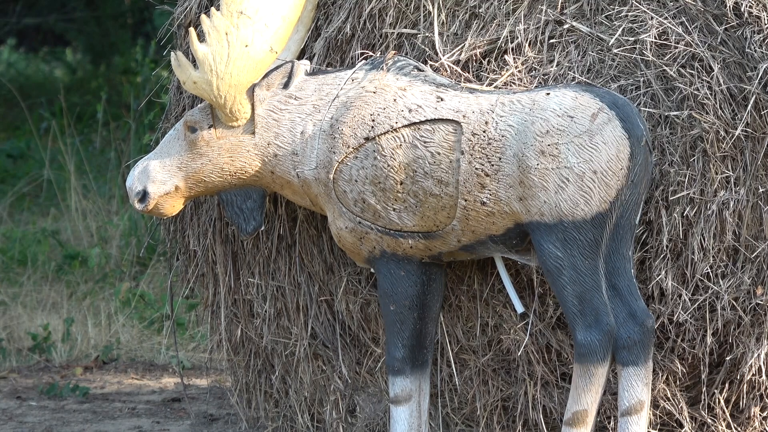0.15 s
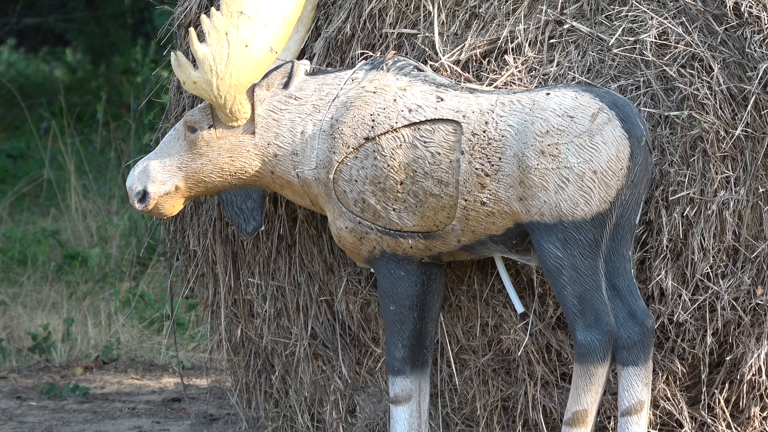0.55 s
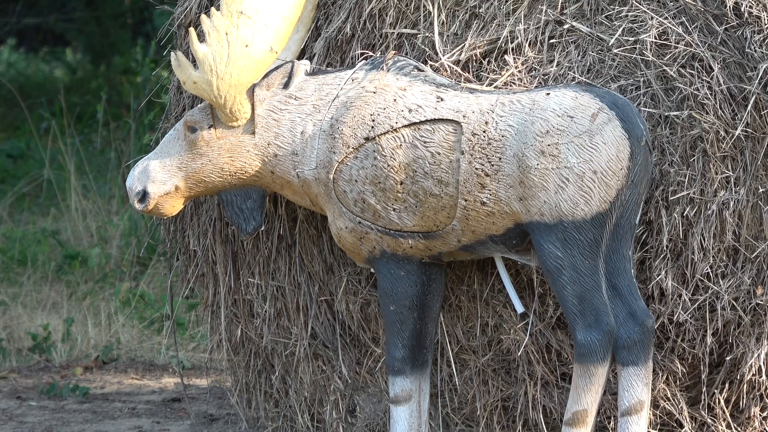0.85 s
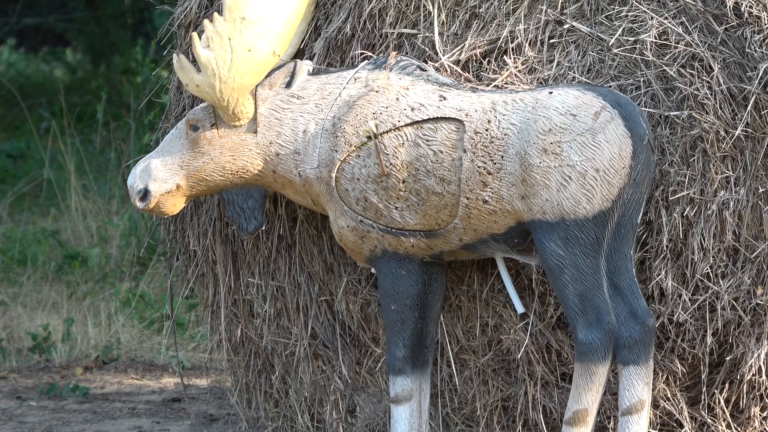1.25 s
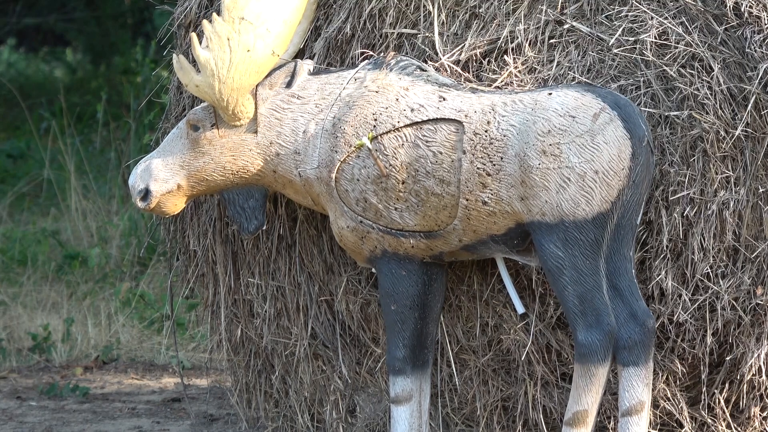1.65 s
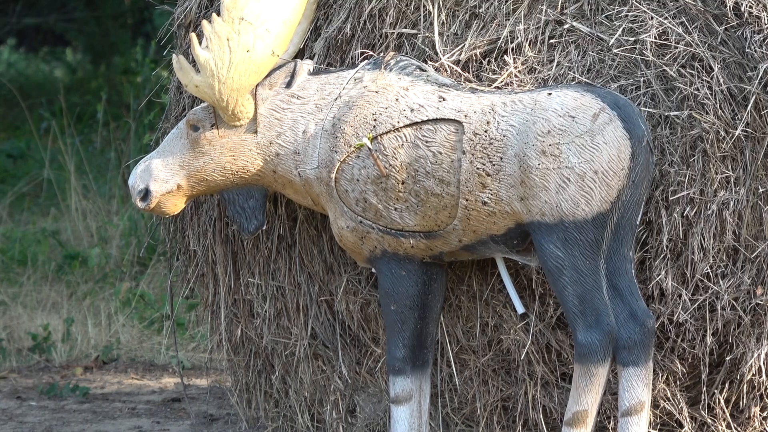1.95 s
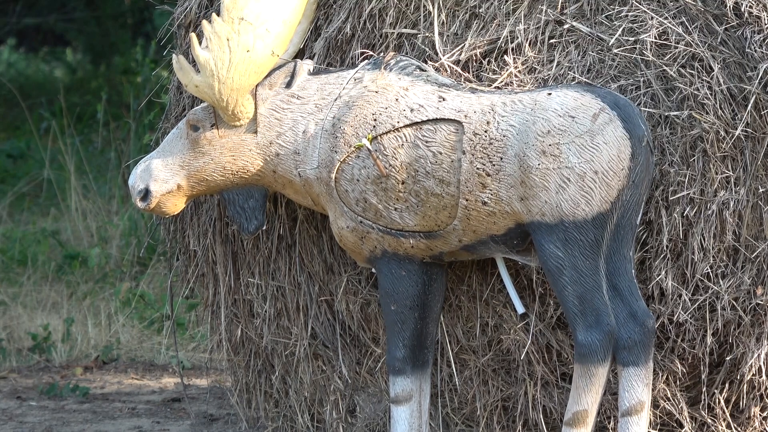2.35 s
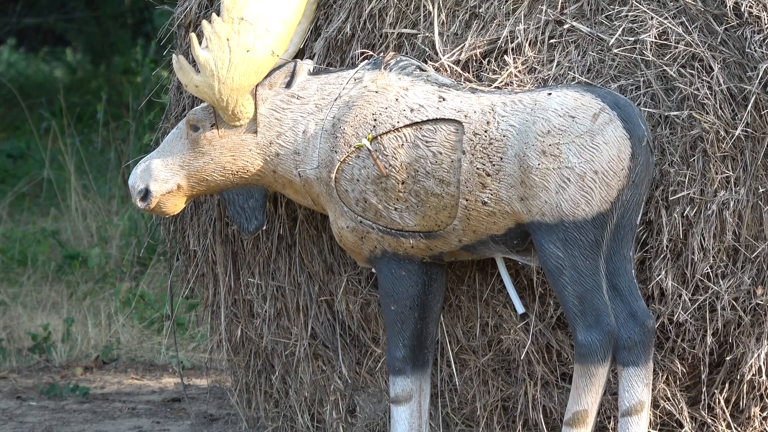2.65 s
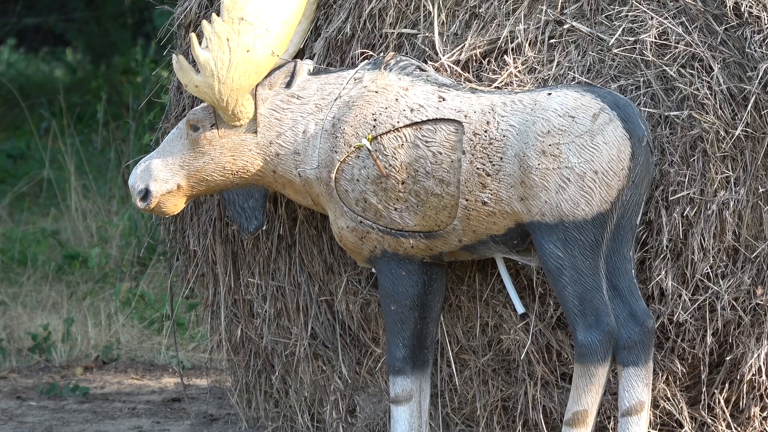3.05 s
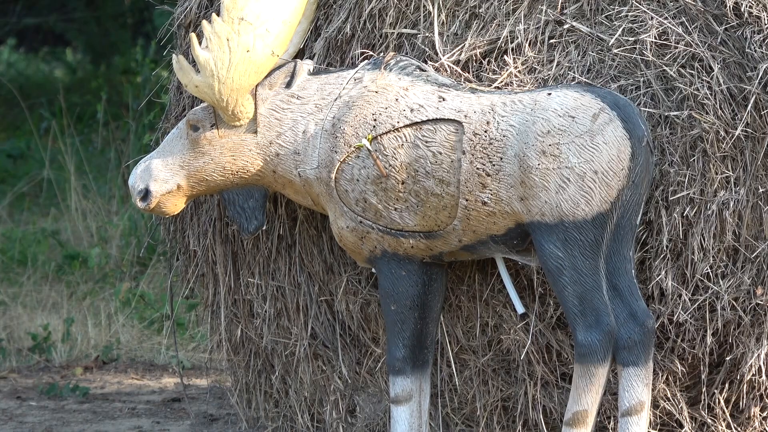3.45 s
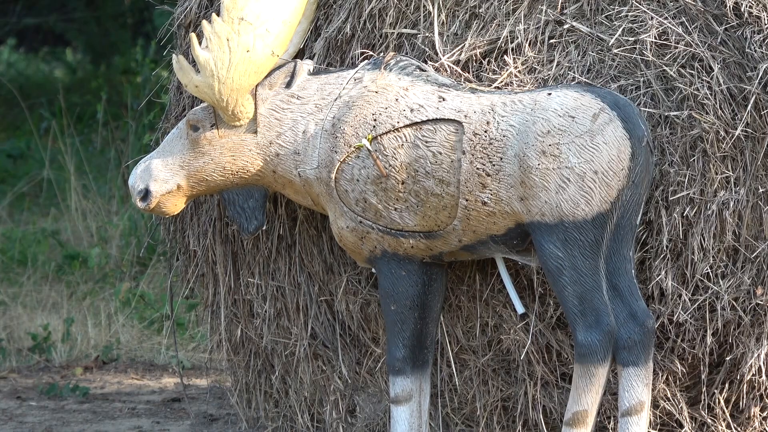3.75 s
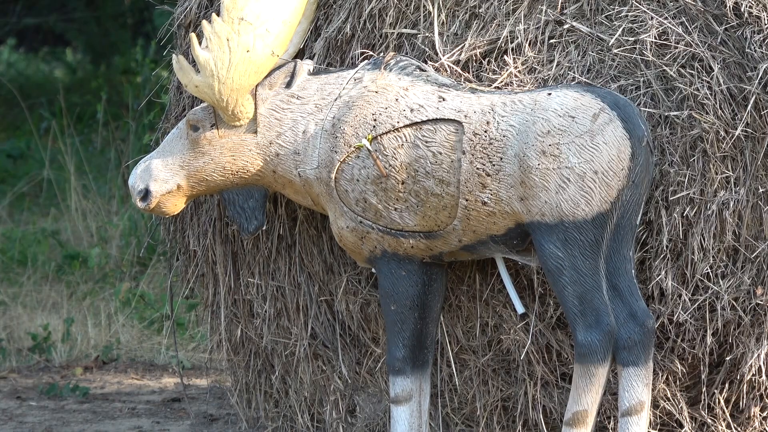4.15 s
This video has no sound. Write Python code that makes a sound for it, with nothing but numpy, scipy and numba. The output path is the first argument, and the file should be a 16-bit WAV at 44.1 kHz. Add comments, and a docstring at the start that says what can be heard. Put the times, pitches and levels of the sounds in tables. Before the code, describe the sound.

Steady shimmering insects fill an open yard, with a faint hum beneath. After some faint, quick bird peeps comes a loud, hard bow release with a short woody rattle, then a knock as the arrow strikes the foam target, leaving a short scattered echo. The insects carry on and grow louder while grainy rustles and small crunches come in bouts close to the mono microphone, and two short whistled peeps sound.

```python
"""Insects hiss throughout, as shaped noise that slowly swells, over low air noise and a faint hum; four faint bird
peeps, gliding sines, come early. Then a bow is shot: damped modes and noise bursts snap, slam and buzz out.
A quarter second later the arrow knocks into a foam target with a crack and a dull thump, and clicks as it settles.
Soft noise rustles with crunches near the mono microphone grow later on, and two louder peeps sound.
A gain control ducks under loud sounds such as the shot."""
import sys
import numpy as np
from scipy import signal
from scipy.fft import rfft, irfft
from scipy.io import wavfile
from scipy.ndimage import uniform_filter1d
from numba import njit

SR = 44100
rng = np.random.default_rng(int(sys.argv[2]) if len(sys.argv) > 2 else 0)


def file_out(sig):
    """Save sig as 16-bit WAV at sys.argv[1]."""
    # one column per channel
    cols = np.atleast_2d(sig).T
    # limit, then scale
    lim = np.clip(cols, -1, 1)
    pcm = np.round(lim * 32767).astype(np.int16)
    wavfile.write(sys.argv[1], SR, pcm)


N = 189541
T = np.arange(N) / SR  # time in seconds

# Colours of noise. Each row: frequency in Hz, relative level in dB per Hz.
# Low outdoor rumble.
AIR_COLOUR = [(20, -5), (33, -5), (45, 5.5), (64, 2), (90, -1.5), (125, -9.5), (170, -9), (275, -17.5),
              (400, -17), (800, -26.5), (2000, -25.5)]
# Lower and higher parts of the insect chorus.
LOW_SINGERS_COLOUR = [(1500, -24), (2000, -20), (2380, -13), (2700, -10.5), (3100, -1), (4000, 0.5),
                      (5000, -0.5), (6000, -21), (8000, -20)]
HIGH_SINGERS_COLOUR = [(4000, -26), (5000, -5), (5800, 0.5), (6600, -0.5), (7500, -2), (8400, -5),
                       (9400, -13), (10700, -26.5), (12600, -23.5), (14000, -30.5), (15500, -59)]
# Soft rustling near the microphone.
RUSTLE_GRAIN_COLOUR = [(150, 1.5), (300, 0), (600, 4), (1300, -1), (2200, -0.5), (5000, -38), (14000, -36)]
# Echoes of the yard.
ECHO_COLOUR = [(80, -3), (250, -3), (700, -9), (2000, 7), (5000, -7), (14000, -25)]
# Sharp noise of the snap, the sliding shaft and the strike.
CRACK_NOISE_COLOUR = [(400, 4), (900, 0.5), (2300, -11.5), (3000, -7), (4600, -11.5), (8000, -18),
                      (15500, -42)]
# Rattle of the bow's loose fittings and slam of the string.
RATTLE_NOISE_COLOUR = [(300, 16), (700, 4.5), (2300, 0), (4000, 0), (7000, -17), (11000, -11.5),
                       (15500, -14)]

# Single insects that stand out. Each row: frequency in Hz, level in dB before the swell and a slow drift.
SOLO_INSECTS = [(5630, -40), (5846, -37.5), (6360, -38.5), (6546, -40), (6971, -40), (7290, -38),
                (7687, -47), (8333, -44.5), (9270, -47.5)]
# Phrases in which the chorus lifts. Each row: middle of the rise in seconds, middle of the fall in seconds, lift in dB.
CHORUS_PHRASES = [(-.1, 0.383, 2.5), (1.25, 1.605, 2), (1.714, 2.307, 1.9), (2.525, 3.004, 2),
                  (3.185, 3.54, 2), (3.79, 4.4, 1.1)]
# Bird peeps. Each row: start in seconds, length in seconds, top pitch in Hz, level in dB, before small wavers.
BIRD_PEEPS = [(-.008, .03, 2390, -37), (.04, 0.027, 2420, -37), (.086, .032, 2420, -33.5),
              (.135, 0.028, 2400, -37), (2.753, .088, 2150, -33.5), (3.396, .082, 2065, -30)]
# Bouts of stronger rustling. Each row: middle in seconds, half length in seconds, level in dB.
RUSTLE_BOUTS = [(2.583, .16, -40.5), (3.107, 0.13, -38), (3.31, 0.14, -43.5), (3.66, 0.077, -40.5),
                (3.975, 0.12, -41), (4.3, .08, -42)]
# The loudest crunches in the rustle. Each row: start in seconds, level in dB.
LOUD_CRUNCHES = [(2.445, -34), (2.644, -30.5), (2.699, -27), (3.184, -29), (3.279, -33), (3.376, -37),
                 (3.528, -33.5), (3.686, -36)]
# Light clicks as the stuck arrow settles. Each row: start in seconds, level in dB.
SETTLING_CLICKS = [(1.238, -26), (1.267, -28), (1.29, -29), (1.39, -32.5)]
# Arrow shaft and foam skin at the strike. Each row: frequency in Hz, level in dB, T60 decay in seconds.
SHAFT_MODES = [(277, -17, 0.042), (558, -10.5, 0.027), (1025, -5, 0.014), (1940, -11, 0.014)]
# The snap of the release. Each row: frequency in Hz, level in dB, T60 decay in seconds.
SNAP_MODES = [(330, -25, 0.0089), (656, 0, 0.032), (1030, -2, 0.018), (1290, -7.5, 0.035), (1900, -28, .04),
              (2370, -14, 0.029), (4070, -2, 0.0088)]
# Limbs, string and riser after the shot. Each row: frequency in Hz, level in dB before the rising tilt
# and the slow build-up, T60 decay in seconds.
BOW_MODES = [(96.2, -21.5, 1.22), (140.4, -18.5, 0.43), (195.2, -7.5, 0.2), (240, -11, 0.15),
             (365, -1.5, 0.14), (406, 5.5, 0.14), (486, -12.5, 0.22), (551, -17, 0.24), (636, -14, 0.18),
             (678, -45, 1.55), (1174, -25, 0.15), (1270, -29, 0.16), (1466, -22, 0.12), (1950, -16.5, 0.09)]

# Moments: string let go, shaft slides over the rest, string pulled taut, tip enters, foam bulges.
LOOSE_S, SLIDE_S, BRACE_S, STRIKE_S, BULGE_S = 0.9458, 0.959, 0.964, 1.2155, 1.2237

# Steady swell of the chorus: level at the start and growth.
LOW_DB, LOW_SWELL_DB_PER_S = -28.5, 1.2544
HIGH_DB, HIGH_SWELL_DB_PER_S = -26, 1.5948
PHRASE_RISE_S, PHRASE_FALL_S = 0.18, 0.073
LOW_JOIN_SHARE = 0.27  # how far the low singers follow a phrase

# A faint stir sets in before the shot, steady rustling later: middle of the ramp, its length, level.
STIR_S, STIR_RISE_S, STIR_DB = 0.69, 0.14, -52.5
RUSTLE_S, RUSTLE_RISE_S, RUSTLE_DB = 2.23, 0.22, -45.5
CRUNCH_HZ, CRUNCH_WIDTH_HZ, CRUNCH_T60_S = 1380, 580, 0.056
CRACKLES_PER_S, CRACKLE_GAIN_DB, CRACKLE_T60_S = 26, 2.5, 0.037
CRACKLE_HZ, CRACKLE_WIDTH_HZ = 1170, 1200

SETTLE_HZ, SETTLE_WIDTH_HZ, SETTLE_T60_S = 1800, 2200, 0.024
TOP_HZ = 15700  # treble cutoff


def undb(db):
    """Decibels to gain."""
    return 10 ** (np.asarray(db) / 20)


def unit(x):
    """Scale to rms 1."""
    return x / np.sqrt(np.mean(x ** 2))


def noise(colour, patchy_db=0):
    """Noise of rms 1 that follows a colour table and falls away beyond its ends; patchy_db adds fine ridges."""
    hz, db = np.transpose(colour)
    f = np.fft.rfftfreq(N, 1 / SR) + 1  # the 1 Hz offset keeps the logarithm finite
    ridges = unit(uniform_filter1d(rng.standard_normal(len(f)), size=150))
    gain = undb(np.interp(np.log(f), np.log(hz), db) + patchy_db * ridges)
    ends = np.minimum(1, np.minimum(f / hz[0], hz[-1] / f)) ** 2
    spectrum = rfft(rng.standard_normal(N)) * gain * ends
    return unit(irfft(spectrum, N))


def band(hz, width_hz):
    """Noise of rms 1 in one resonance."""
    f = np.fft.rfftfreq(N, 1 / SR) + 1
    detuning = (f - hz * hz / f) / width_hz
    spectrum = rfft(rng.standard_normal(N)) / (1 + detuning ** 2)
    return unit(irfft(spectrum, N))


def drift(rate):
    """Smooth random wander of rms 1 that takes about rate new values a second."""
    hold = max(int(SR / rate), 1)
    steps = np.repeat(rng.standard_normal(N // hold + 1), hold)
    return unit(uniform_filter1d(steps, hold)[:N])


def fade(start, t60):
    """An envelope that jumps to 1 at start and dies away by 60 dB in t60 seconds."""
    return (T >= start) * np.exp(-np.log(1000) * np.maximum(T - start, 0) / t60)


def swell(middle, width):
    """A bell-shaped envelope."""
    return np.exp(-((T - middle) / width) ** 2)


def rise(middle, length):
    """A straight ramp from 0 to 1 that is half way at middle."""
    return np.clip(0.5 + (T - middle) / length, 0, 1)


def ring(start, modes, step=1):
    """Damped modes set off by one blow; each is scaled by step over the last, and a negative step flips its sign."""
    total = 0
    for k, (hz, db, t60) in enumerate(modes):
        tone = np.sin(2 * np.pi * hz * (T - start))
        total = total + step ** k * undb(db) * fade(start, t60) * tone
    return total


def clicks(rows, hz, width_hz, t60):
    """Short noise bursts that share one resonance and decay."""
    envelope = sum(undb(db) * fade(start, t60) for start, db in rows)
    return envelope * band(hz, width_hz)


def air():
    """A low outdoor rumble that wavers in level, and a far hum of very narrow noise."""
    rumble = noise(AIR_COLOUR) * undb(-43 + drift(5.97))
    hum = undb(-56.5) * band(284.9, 7.3)
    return rumble + hum


def insects(stroke_hz=41, stroke_db=0.39, solo_width_hz=18):
    """Many raspers merge into a swelling hiss that throbs with wing strokes; a few near ones hold narrow tones."""
    lift_db = 0
    for start, end, db in CHORUS_PHRASES:
        lift_db = lift_db + db * rise(start, PHRASE_RISE_S) * (1 - rise(end, PHRASE_FALL_S))
    low_db = LOW_DB + LOW_SWELL_DB_PER_S * T + LOW_JOIN_SHARE * lift_db
    high_db = HIGH_DB + HIGH_SWELL_DB_PER_S * T + lift_db

    # the stroke rate wanders slightly
    phase = 2 * np.pi * np.cumsum(stroke_hz * (1 + 0.019 * drift(4.93))) / SR
    throb_db = stroke_db * (np.cos(phase) + 0.76 * np.cos(2 * phase))

    low_flicker_db = 0.35 * drift(25.35) + 0.95 * drift(600)
    high_flicker_db = 0.38 * drift(17) + 0.47 * drift(700)
    low = noise(LOW_SINGERS_COLOUR, patchy_db=1.2) * undb(low_db + throb_db + low_flicker_db)
    high = noise(HIGH_SINGERS_COLOUR, patchy_db=1.0) * undb(high_db + throb_db + high_flicker_db)
    solo = sum(undb(db + drift(2.86)) * band(hz, solo_width_hz) for hz, db in SOLO_INSECTS)
    return low + high + solo * undb(high_db - high_db.mean())


def bird(arch=0.14):
    """Short pure whistles whose pitch and loudness arch up and down."""
    out = 0
    for start, length, top_hz, db in BIRD_PEEPS:
        u = np.clip(2 * (T - start) / length - 1, -1, 1)  # from -1 at the start to 1 at the end
        pitch = top_hz * (1 - arch * u ** 2 + 0.0034 * drift(150))
        whistle = np.sin(2 * np.pi * np.cumsum(pitch) / SR)
        out = out + undb(db + drift(130)) * (1 - u ** 2) * whistle
    return out


def crackle():
    """Tiny crunches of random size at random moments."""
    hits = (rng.random(N) < CRACKLES_PER_S / SR) * rng.uniform(0, 1.9, N)
    envelope = signal.fftconvolve(hits, fade(0, CRACKLE_T60_S))[:N]
    return envelope * band(CRACKLE_HZ, CRACKLE_WIDTH_HZ) * undb(CRACKLE_GAIN_DB)


def rustle():
    """An uneven grainy rustle that comes in bouts, with a few distinct crunches and one brief high swish."""
    parts = [undb(STIR_DB) * rise(STIR_S, STIR_RISE_S), undb(RUSTLE_DB) * rise(RUSTLE_S, RUSTLE_RISE_S)]
    parts += [undb(db) * swell(middle, half) for middle, half, db in RUSTLE_BOUTS]
    strength = np.sqrt(sum(part ** 2 for part in parts))  # the layers add in power
    flicker_db = 0.62 * drift(25.16) + 1.4 * drift(250)
    grain = noise(RUSTLE_GRAIN_COLOUR) * undb(flicker_db) + crackle()
    crunches = clicks(LOUD_CRUNCHES, CRUNCH_HZ, CRUNCH_WIDTH_HZ, CRUNCH_T60_S)
    swish = undb(-42) * swell(3.12, 0.046) * band(14500, 3000)
    return strength * grain + crunches + swish


def yard(x, early_db=-23, early_t60=0.16, late_db=-32, late_t60=0.89):
    """Scattered echoes from ground and hay, and a faint long tail from the trees, as decaying noise."""
    early = undb(early_db) * unit(fade(0.0086, early_t60))
    late = undb(late_db) * unit(fade(0.016, late_t60))
    response = (early + late) * noise(ECHO_COLOUR) / np.sqrt(N)
    return signal.fftconvolve(x, response)[:N]


def settling():
    """The stuck arrow settles with light clicks of resonant noise."""
    return clicks(SETTLING_CLICKS, SETTLE_HZ, SETTLE_WIDTH_HZ, SETTLE_T60_S)


def strike(bulge_hz=215, bulge_db=-3.0):
    """The tip cracks through the skin; the foam stops the arrow, and its flank bulges once with a dull thump."""
    crack = ring(STRIKE_S, SHAFT_MODES) + undb(-13.0) * fade(STRIKE_S, 0.021) * noise(CRACK_NOISE_COLOUR)
    # the stuck shaft shivers out
    shiver = undb(-28.0) * fade(STRIKE_S, 0.26) * noise(CRACK_NOISE_COLOUR)
    # pressure follows the flank's acceleration
    u = (np.pi * bulge_hz * (T - BULGE_S)) ** 2
    thump = undb(bulge_db) * (1 - 2 * u) * np.exp(-u)
    return crack + shiver + thump


def shot():
    """The release snaps, the shaft sings over the rest, then the string slams taut and the bow rings and rattles."""
    # the catch opens just before the string goes
    trigger = undb(-17) * fade(LOOSE_S - 0.0015, 0.018) * band(1700, 1500)
    snap = ring(LOOSE_S, SNAP_MODES, -1.0) + undb(-5.5) * fade(LOOSE_S, 0.029) * noise(CRACK_NOISE_COLOUR)
    scrape = undb(-16.5) * band(2250, 250) + undb(-14.5) * noise(CRACK_NOISE_COLOUR)
    slide = swell(SLIDE_S, 0.011) * scrape
    slam = undb(-7) * fade(BRACE_S, 0.0071) * noise(RATTLE_NOISE_COLOUR)
    slam = slam + ring(BRACE_S, [(207, 0.5, 0.036)])
    # loose fittings buzz once on each swing of the string, at the pitch of the third bow mode
    buzz = undb(5.8 * np.cos(2 * np.pi * BOW_MODES[2][0] * (T - BRACE_S)))
    rattle = undb(-10.0) * fade(BRACE_S, 0.24) * buzz * noise(RATTLE_NOISE_COLOUR)
    # the limbs need a few swings to hand their energy to the rest of the bow
    build_up = 1 - 0.69 * fade(BRACE_S, 0.26)
    body = ring(BRACE_S, BOW_MODES, -1.066) * build_up
    return trigger + snap + slide + slam + rattle + body


def scene():
    """Shot and strike with their echoes, over air, insects, bird and rustle, the same in both channels."""
    background = air() + insects() + bird() + rustle()
    knocks = strike() + shot()
    mono = background + knocks + yard(knocks) + settling()
    return np.array([mono, mono])


@njit
def follow(x, attack, release):
    """Envelope follower with separate rise and fall rates."""
    out, level = np.empty(len(x)), 0.
    for i in range(len(x)):
        rate = attack if abs(x[i]) > level else release
        level += (abs(x[i]) - level) * rate
        out[i] = level
    return out


def record(dry, top_db=-8, attack_s=0.0025, release_s=0.023):
    """Gain control ducks under loud sounds, the peaks clip, and the top is cut."""
    envelope = follow(dry[0], 1 / (attack_s * SR), 1 / (release_s * SR))
    ducked = dry / np.maximum(1, envelope / undb(top_db))
    clipped = np.clip(ducked, -1, 1)
    top_cut = signal.ellip(10, 0.05, 60, TOP_HZ, fs=SR, output="sos")
    return signal.sosfiltfilt(top_cut, clipped)


dry = scene()
out = record(dry)
file_out(out)
```